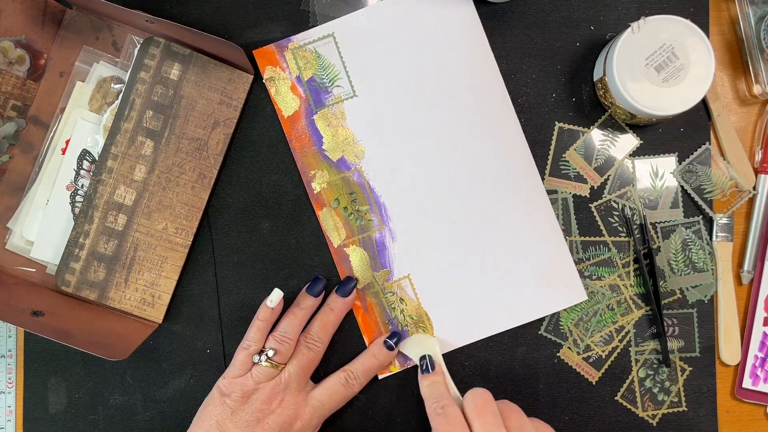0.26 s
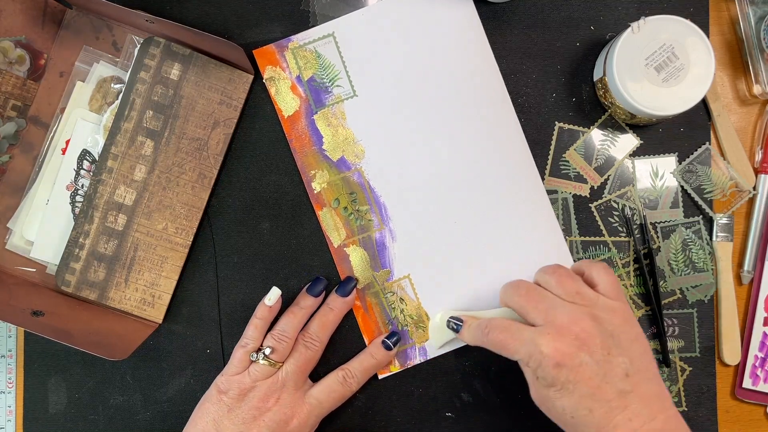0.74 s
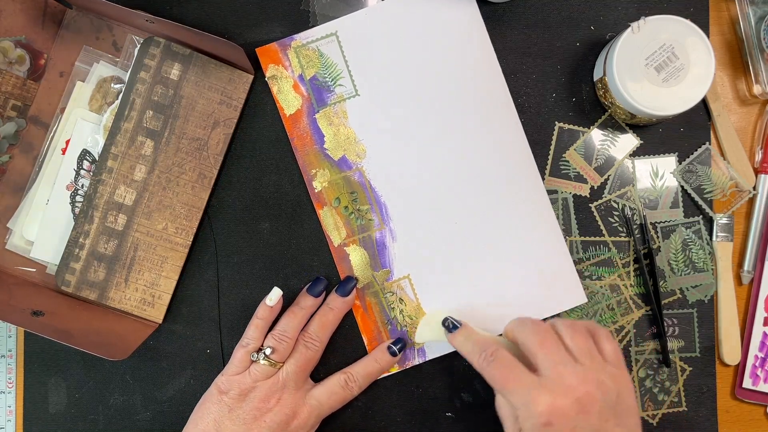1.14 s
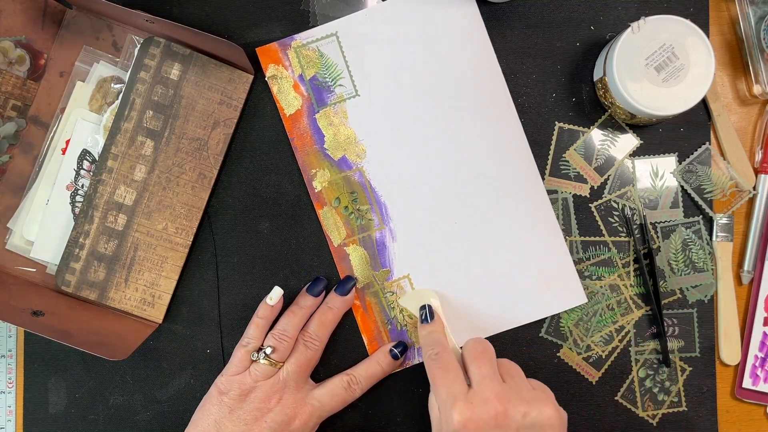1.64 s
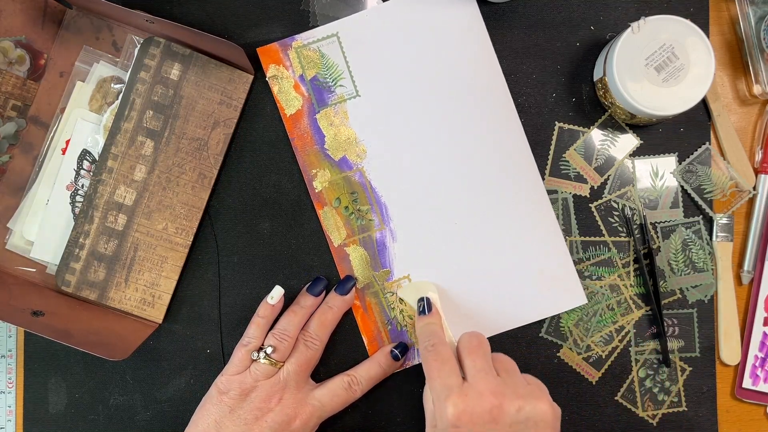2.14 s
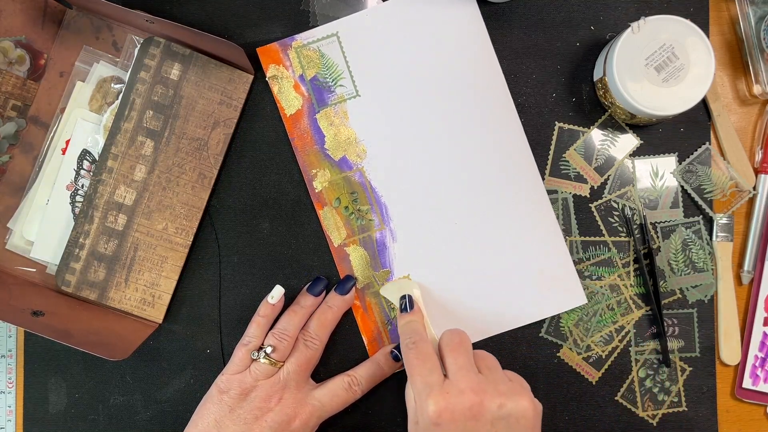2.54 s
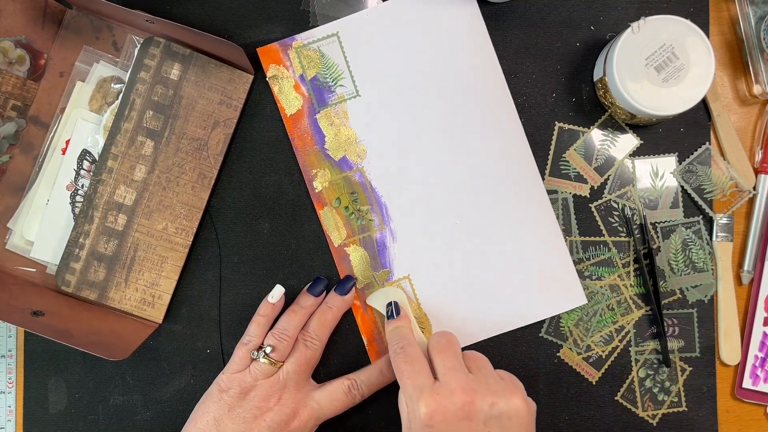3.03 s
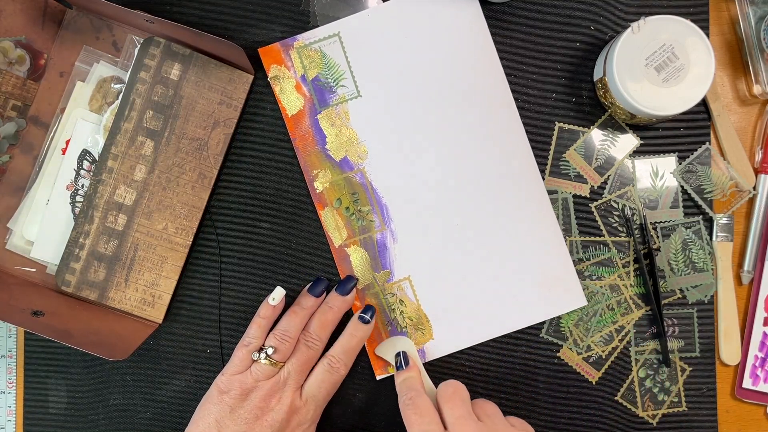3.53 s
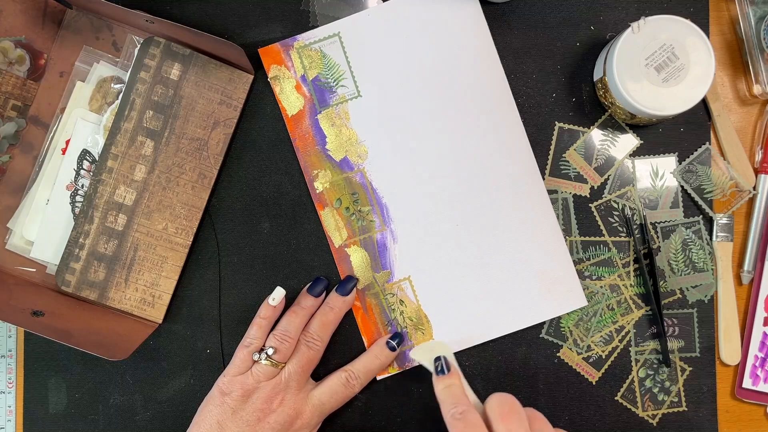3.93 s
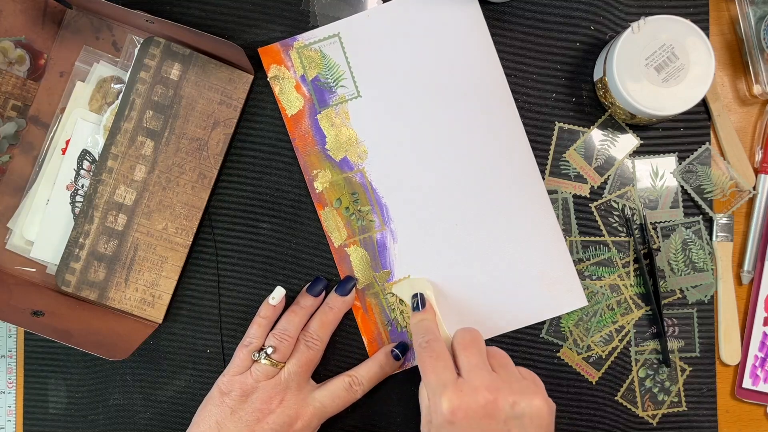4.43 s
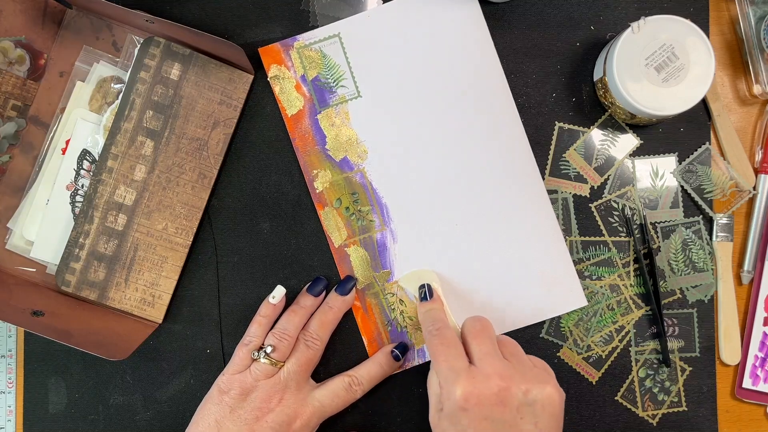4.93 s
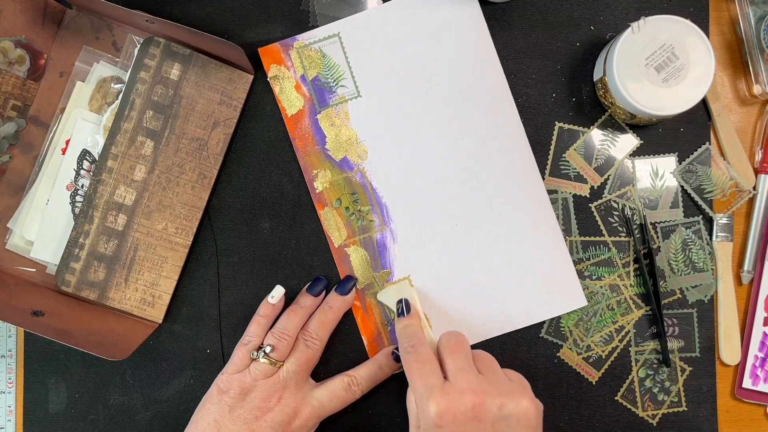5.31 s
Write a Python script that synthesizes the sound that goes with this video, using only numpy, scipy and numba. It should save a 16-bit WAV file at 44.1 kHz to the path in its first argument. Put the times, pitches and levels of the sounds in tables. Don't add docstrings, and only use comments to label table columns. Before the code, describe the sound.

A smooth flat tool rubs briskly back and forth over a paper sticker, grainy scratchy hiss broken by sharp clicks, knocks and soft desk thuds.

```python
import sys
import numpy as np
from scipy import signal
from scipy.fft import rfft, irfft, next_fast_len
from scipy.io import wavfile
from scipy.ndimage import uniform_filter1d
from numba import njit

SR = 44100
rng = np.random.default_rng(int(sys.argv[2]) if len(sys.argv) > 2 else 0)


def materialize(psi):
    bounded = np.clip(np.atleast_2d(psi).T, -1, 1)
    quanta = np.round(bounded * 32767).astype(np.int16)
    wavfile.write(sys.argv[1], SR, quanta)


def boost_factor(decibels):
    exponent = np.asarray(decibels, float) / 20
    return 10 ** exponent


N = 245455


def level(x, db):
    return x * boost_factor(db) / np.sqrt(np.mean(x ** 2))


def noise(count=N):
    return rng.standard_normal(count)


@njit
def bandpass(x, hz, width):
    y, band, low = np.empty(len(x)), 0., 0.
    g, damping = np.tan(np.pi * hz / SR), width / hz
    for i in range(len(x)):
        v = (band + g * (x[i] - low)) / (1 + g * (g + damping))
        band, low, y[i] = 2 * v - band, low + 2 * g * v, damping * v
    return y


def steep(x, hz, width_hz):
    once = bandpass(x, 1. * hz, 1.23 * width_hz)
    return level(bandpass(once, 1. * hz, 1.23 * width_hz), 0)


def colour(x, points):
    hz, db = np.transpose(points)
    size = next_fast_len(N)
    f = np.maximum(np.arange(size // 2 + 1) * SR / size, 1)
    gain = boost_factor(np.interp(np.log(f), np.log(hz), db))
    return irfft(rfft(x, size) * gain, size)[:N]


def walk(count):
    hold = SR // count
    steps = np.repeat(rng.standard_normal(N // hold + 1), hold)
    return 1.3 * uniform_filter1d(uniform_filter1d(steps, hold), hold)[:N]


def curve(rows):
    s, db = np.transpose(rows)
    return np.interp(np.arange(N) / SR, s, db)


def add(out, s, piece):
    i = int(s * SR)
    out[i:i + len(piece)] += piece[:N - i]


def decay(t, t60):
    return np.exp(-np.log(1000) * t / t60)


def ring(hz, t60, size):
    t = np.arange(size) / SR
    return np.sin(2 * np.pi * hz * t) * decay(t, t60)


# t/s, level/dB, length/s, fine hiss over scrape/dB
SKIDS = [(.1678, -57, .010, -4), (1.152, -57, .013, 3), (1.252, -53, .010, -4), (3.0535, -54, .011, 2),
         (3.906, -61, .014, 6), (3.995, -56, .018, 3), (4.072, -57, .013, 6), (5.031, -61, .02, 2),
         (5.352, -60, .014, -8), (5.394, -67, .012, 0)]


def rubbing():
    load = np.zeros((len(SCRAPE), N))
    for shape, db, fine_db, coarse_db in strokes():
        sheen_db = -1 + 0.31 * fine_db
        bands_db = db + np.array([coarse_db, 0, sheen_db, fine_db])
        load = load + np.outer(boost_factor(bands_db) ** 2, shape ** 2)
    t = np.arange(3000) / SR
    for s, skid_db, length, fine_db in SKIDS:
        slide = np.exp(-(t / length) ** 3) + .1 * np.exp(-t / .015)
        shape = np.minimum(t / .002, 1) * slide
        bands_db = skid_db + np.array([0, -4, fine_db / 2 - 1.5, fine_db])
        for band, db in zip(load, bands_db):
            add(band, s, (boost_factor(db) * shape) ** 2)
    return np.sum(np.sqrt(load) * scrape_bands(spread_db=2.0, flicker_db=0.62), axis=0)


# fastest at t/s, run-up/s, scrape level/dB, fine hiss over it/dB, coarse rasp over it/dB
PUSHES = [(.035, 0.05, -60, 3, -1.5), (.35, 0.029, -67.5, 2, 2), (0.446, 0.064, -64.5, 4, 0.5),
          (.615, 0.042, -63, -0.5, 0), (.755, 0.055, -60, 0.5, 0.5), (1.05, 0.072, -69.5, 1, 2),
          (1.33, 0.067, -74, -16, 6), (1.635, 0.043, -61.5, -4, -6), (1.806, 0.056, -56.5, -3.5, -0.5),
          (2.04, 0.047, -63.5, 4.5, -2.5), (2.345, 0.061, -61.5, -2.5, -1.5), (2.59, 0.069, -67, -9, -4),
          (2.93, 0.023, -65.5, 0, -1), (3.823, 0.047, -61, 7.5, 0), (4.49, 0.093, -64, -6, 0.5),
          (4.67, 0.067, -60.5, -3.5, -2), (4.945, 0.053, -63.5, 2, -3), (5.25, 0.045, -61.5, -5.5, -0.5)]
# fastest at t/s, run-out/s, scrape level/dB, fine hiss over it/dB, coarse rasp over it/dB
PULLS = [(0.179, 0.016, -59, -9, -17), (.25, 0.018, -65.5, -1, -1), (.785, 0.043, -63, -3, 0),
         (.9, 0.023, -60.5, -9, -0.5), (1.2, 0.024, -77, 10, 0.1), (1.39, 0.061, -61.5, 4.5, -3),
         (1.435, 0.069, -58.5, -4, -6), (1.515, 0.028, -60.5, -3, -5), (1.9, 0.041, -61.5, 0, 1.2),
         (2.142, 0.057, -59, 2, -1), (2.415, 0.066, -61, -1, -2), (2.65, 0.029, -60, -2, 0),
         (2.81, 0.047, -66, -1.5, 6), (3.02, .03, -82, -2, -3), (4.03, 0.028, -65, -1, 2),
         (4.78, 0.092, -62.5, -6.5, 0.1), (5.032, 0.065, -58.5, -1, -6.5), (5.385, 0.034, -58, 0.5, -4),
         (5.43, 0.024, -58.5, -3.5, -5.5), (5.54, 0.046, -60.5, 0, -4)]
# from t/s, to t/s, scrape level/dB, fine hiss over it/dB, coarse rasp over it/dB
DRAGS = [(3.23, 3.306, -66, -3.5, -13), (3.365, 3.562, -64.5, -1.5, -8), (3.602, 3.704, -67.5, 1, -6),
         (4.166, 4.332, -62.5, -2.3, -4.5)]


def strokes():
    stop_s, jerk_s, drag_edge_s = 0.026, 0.015, 0.03
    t = np.arange(N) / SR

    def hump(s, rise, fall):
        return np.exp(-((t - s) / np.where(t < s, rise, fall)) ** 2)

    yield 1 - 0.25 * hump(3.14, 0.041, 0.041), -69.5, 0, 0.5
    for s, run_up, *levels in PUSHES:
        yield hump(s, run_up, stop_s), *levels
    for s, run_out, *levels in PULLS:
        yield hump(s, jerk_s, run_out), *levels
    for start, end, *levels in DRAGS:
        outside = t - np.clip(t, start, end)
        yield np.exp(-(outside / drag_edge_s) ** 2), *levels


# low edge f/Hz, high edge f/Hz
SCRAPE = [
    (900, 2400),
    (2400, 5000),
    (5000, 8500),
    (8500, 15800),
]
# f/Hz, level/dB
PAGE = [(500, 21), (900, 7), (1500, 3), (2400, 3.5), (3600, 1), (7500, -4.5), (12000, 8), (15000, 3.5),
        (16400, -24)]


def scrape_bands(spread_db, flicker_db):
    slips = level(fibres(.5, spread_db), 0)
    slips = colour(slips + boost_factor(-13) * sheet(slips, wander_db=3.0), PAGE)
    slips = patches(slips, patchy_db=1.7)
    catch = walk(count=70)
    bands = []
    for edges in SCRAPE:
        sos = signal.butter(3, edges, "bandpass", fs=SR, output="sos")
        flicker = boost_factor(flicker_db * (catch + 1.64 * walk(count=45)))
        bands.append(level(signal.sosfilt(sos, slips) * flicker, 0))
    return bands


def fibres(share, spread_db):
    slips = (rng.random(N) < share) * noise()
    return slips * boost_factor(spread_db * rng.exponential(size=N))


# f/Hz, width/Hz, level/dB
SHEET = [(1104, 65, -34), (1513, 480, -5), (2050, 31, -52), (2274, 230, -10.5), (2810, 16, -31),
         (3400, 650, -13.5), (3830, 240, -11), (4230, 890, -12.5), (6220, 730, -13), (6940, 2700, -13),
         (10000, 4400, -12), (11300, 6400, -15), (12800, 490, -20)]


def sheet(slips, wander_db):
    out = np.zeros(N)
    for hz, width_hz, db in SHEET:
        swell = boost_factor(db + wander_db * walk(count=18))
        out += swell * steep(slips, hz, width_hz) * np.sqrt(width_hz / 1000)
    return out


def patches(slips, patchy_db):
    out = slips.copy()
    for hz in np.arange(2200., 15000, 1600):
        out += (boost_factor(patchy_db * walk(count=20)) - 1) * bandpass(slips, hz, 1500.)
    return out


# t/s, then peak level/dB of the low, middle, high and knock groups
TICKS = [(0.1672, -40, -38, -30, -51), (0.7757, -53, -54, -41, -55), (1.136, -41, -39, -36, -62),
         (1.1513, -39, -46, -33, -51), (2.1231, -58, -56, -52, -66), (2.139, -54, -52, -46, -62),
         (2.2530, -46, -54, -62, -48), (2.3994, -56, -54, -49, -64), (2.648, -58, -58, -53, -64),
         (2.6957, -48, -46, -42, -60), (2.9744, -62, -59, -43, -62), (3.4291, -58, -60, -50, -66),
         (3.8468, -53, -46, -37, -52), (4.0712, -41, -47, -43, -51), (4.622, -55, -58, -53, -64),
         (5.010, -56, -56, -51, -64), (5.0313, -44, -50, -46, -53), (5.042, -47, -56, -52, -62),
         (5.4115, -60, -60, -44, -64), (5.5114, -56, -60, -57, -55), (5.5333, -58, -58, -51, -62)]
# f/Hz, t60/s
TICK_MODES = [
    [(2400, 0.0074), (3100, 0.016), (3800, 0.0096), (4600, 0.0055)],
    [(5400, 0.0095), (6500, 0.008), (7400, 0.0038), (8400, 0.0028)],
    [(9800, 0.0015), (11300, 0.0016), (12800, 0.0044), (14300, 0.0028)],
    [(650, 0.0024), (1000, 0.016), (1250, 0.024), (1550, 0.015), (1900, 0.0024)],
]


def ticks():
    out = np.zeros(N)
    for s, *peaks_db in TICKS:
        for modes, db in zip(TICK_MODES, peaks_db):
            snap = noise(16) * np.exp(-np.arange(16) / 1.2)
            body = np.zeros(1500)
            for k, (hz, t60) in enumerate(modes):
                detune = 1 + 0.03 * rng.standard_normal()
                body += (-1) ** k * ring(hz * detune, t60, size=1500)
            piece = np.convolve(snap, body)
            add(out, s, boost_factor(db + 0.5) * piece / np.abs(piece).max())
    return out


# t/s, peak level/dB
LANDINGS = [
    [(1.2516, -22), (1.2531, -38)],
    [(3.0528, -28), (3.0530, -19)],
    [(3.9930, -28.5), (3.9934, -33), (3.9945, -37), (3.9982, -37)],
    [(5.3515, -52), (5.3555, -48), (5.361, -50)],
    [(5.3931, -33)],
]
# f/Hz, level/dB, t60/s
LANDING_MODES = [
    [(253, -3, 0.037), (636, 1.5, 0.0086), (1550, -0.5, 0.027), (2150, -16, 0.052), (3100, -10, 0.011),
     (3420, 2.5, 0.013), (4020, 9, 0.0038), (5300, -2, 0.0076), (6270, 1, 0.0045), (8000, -2, 0.0037),
     (9400, 7, .003), (10400, 0.5, 0.006), (14100, -21, 0.0036)],
    [(1470, -8, 0.016), (2400, -5, 0.0054), (3340, -6, 0.014), (3850, 9, 0.0045), (5300, 6, 0.0078),
     (6200, 1, 0.016), (6850, 7, 0.006), (8750, -6, 0.013), (11100, 4, 0.0049), (11900, 6, 0.0079),
     (12100, -3, 0.0066), (12800, 2, 0.0086), (14400, -16, 0.003), (17100, -17, 0.0046)],
    [(400, -20, 0.0076), (686, 0, 0.014), (1150, 9.5, 0.021), (1520, -21, 0.01), (2420, -13, 0.0036),
     (3500, -8, .012), (3800, 6, 0.023), (4140, 9, 0.0063), (5860, -1, 0.013), (7100, 9, 0.004),
     (8200, -1.5, 0.0044), (10400, -20, 0.0031), (12100, -12, 0.0026), (13100, 2, 0.0056)],
    [(2140, -21, .015), (3740, 3, 0.012), (4200, -11, 0.01), (4600, 19, 0.016), (6760, -4, 0.0073)],
    [(3700, 2, 0.014), (6660, 7, 0.0046), (7500, 5, 0.0077), (11100, 8, .006), (13800, -13, .004),
     (15200, -12, .003)],
]


def landings():
    out = np.zeros(N)
    for contacts, modes in zip(LANDINGS, LANDING_MODES):
        piece = np.zeros(2500)
        for k, (hz, mode_db, t60) in enumerate(modes):
            sign = (-1) ** k if hz < 3000 else 1
            piece += sign * boost_factor(mode_db) * ring(hz, t60, size=2500)
        for s, db in contacts:
            add(out, s, boost_factor(db) * piece / np.abs(piece).max())
    return out


# t/s, peak level/dB, centre f/Hz, width/Hz, t60/s
THUDS = [(0.169, -46.5, 537, 900, 0.082), (0.805, -49, 1100, 200, 0.12), (1.25, -42, 450, 804, 0.18),
         (1.2597, -41, 303, 600, 0.093), (1.581, -49, 350, 497, 0.056), (1.71, -43.5, 403, 880, 0.14),
         (1.984, -44, 346, 795, 0.16), (2.254, -38.5, 400, 900, 0.17), (2.04, -54, 248, 400, 0.07),
         (2.519, -47, 300, 300, 0.16), (2.46, -74, 300, 400, 0.06), (3.821, -48.5, 500, 800, 0.2),
         (0.03, -50, 750, 493, 0.14), (0.746, -62, 366, 400, .06), (2.748, -48, 423, 800, 0.064),
         (3.053, -50, 246, 690, 0.081), (3.177, -56, 300, 500, 0.027), (3.9964, -40.5, 426, 600, 0.044),
         (4.552, -45, 300, 500, 0.19), (4.888, -53, 340, 500, 0.068), (5.169, -51, 251, 500, 0.06),
         (5.5114, -43, 495, 900, 0.061)]


def thuds():
    out = np.zeros(N)
    t = np.arange(5000) / SR
    flex = 0.99 * ring(62, 0.02, size=len(t)) + 0.1 * ring(251, 0.27, size=len(t))
    for s, db, hz, width_hz, t60 in THUDS:
        cycles = (t - .002) * hz
        dent = -np.cos(2 * np.pi * cycles) * np.exp(-(cycles / .5) ** 2)
        push = dent * min(0.082 / t60, 1) - flex
        rattle = bandpass(noise(len(t)), 1. * hz, 1. * width_hz)
        rattle = bandpass(rattle, 1. * hz, 2. * width_hz)
        rattle = rattle * np.minimum(t / 0.0048, 1) * decay(t, t60)
        rattle = rattle / np.abs(rattle).max()
        add(out, s, boost_factor(db) * (2.24 * min(width_hz / hz, 1) * push + 0.76 * rattle))
    return out


def nearby_echoes(x):
    t = np.arange(8000) / SR
    tail = noise(len(t)) * decay(t, .07) * (t > .0015)
    tail = tail / np.sqrt(np.sum(tail ** 2))
    return x + boost_factor(-13) * signal.fftconvolve(x, tail)[:N]


# t/s, sway level/dB
WEIGHT = [(0.0, -22), (0.09, -26), (0.4, -41.5), (1.04, -27.5), (1.5, -34.5), (2.9, -24.5), (3.35, -37.5),
          (4.39, -32), (4.46, -37), (4.56, -27.5), (5.5, -38.5), (5.566, -31.5)]
# t/s, rumble level/dB
EFFORT = [(0.0, -50), (1.19, -47.5), (1.26, -37), (1.32, -50), (1.75, -43.5), (2.2, -44.5), (2.4, -41.5),
          (2.99, -48), (3.15, -64), (3.18, -40), (3.6, -70), (3.7, -44), (3.92, -59), (3.98, -50.5),
          (5.15, -43), (5.29, -61), (5.36, -44.5), (5.57, -36.5)]


def desk():
    sway_db, effort_db = curve(WEIGHT), curve(EFFORT)
    sway = steep(noise(), 5.22, 4.18)
    rumble = steep(noise(), 28.3, 28.2)
    body = steep(noise(), 299, 290) * boost_factor(1.2 * walk(count=15))
    body_db = -66 + 0.15 * (effort_db - np.mean(effort_db))
    return boost_factor(sway_db) * sway + boost_factor(effort_db - 2) * rumble + boost_factor(body_db) * body


# f/Hz, level/dB per Hz
ROOM = [(45, -70.5), (78, -89.5), (115, -81), (160, -85), (310, -92.5), (500, -92.5), (800, -95),
        (1100, -100), (2000, -103), (4000, -106), (7000, -110), (12000, -110), (15800, -112)]
# multiple of the turning rate, rms level/dB
MOTOR = [(8, -74.5), (10, -77), (11, -69), (12, -73.5), (13, -66.5), (16, -82), (20, -85)]
# f/Hz, width/Hz, rms level/dB
HUM = [(99, 13, -60), (199.4, 7.6, -66.5)]


def room():
    out = colour(noise() * np.sqrt(SR / 2), ROOM)
    motor_hz = 46.93 * (1 + 0.002 * walk(count=3))
    turn = 2 * np.pi * np.cumsum(motor_hz) / SR
    for order, db in MOTOR:
        swell = np.sqrt(2) * boost_factor(db - 0.7 + 2.5 * walk(count=8))
        out += swell * np.sin(order * turn + 2 * np.pi * rng.random())
    for hz, width_hz, db in HUM:
        out += boost_factor(db) * steep(noise(), hz, width_hz)
    return out


def scene():
    on_the_page = rubbing() + ticks() + landings() + thuds()
    return (nearby_echoes(on_the_page) + desk() + room())[None]


def duck(x):
    over = np.maximum(np.abs(np.diff(x[0], prepend=0)) / boost_factor(-25) - 1, 0)
    t = np.arange(20000) / SR
    delay_s, recover_s, depth = 0.012, 0.1, 0.3
    dip = (1 - np.exp(-(t / delay_s) ** 3)) * np.exp(-(t / recover_s) ** 2)
    held = signal.fftconvolve(over, dip)[:N]
    return x * (1 - depth * held / max(held.max(), 1e-9))


def top_cut(x):
    return signal.sosfilt(signal.butter(12, 16520, fs=SR, output="sos"), x)


def record(dry):
    mic = signal.ellip(8, .1, 50, 16480, fs=SR, output="sos")
    heard = signal.sosfiltfilt(mic, duck(dry))
    above = signal.ellip(8, .02, 40, 15900, "highpass", fs=SR, output="sos")
    top = signal.sosfiltfilt(above, heard)
    loud_top = uniform_filter1d(np.abs(top), size=100) > boost_factor(-70)
    attack = uniform_filter1d(1. * loud_top, size=128)
    mix = heard - top * (1 - attack) * (1 - boost_factor(-34))
    return top_cut(mix)


dry = scene()
out = record(dry)
materialize(out)
```